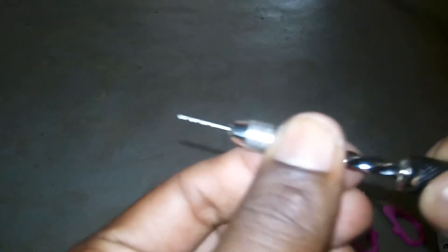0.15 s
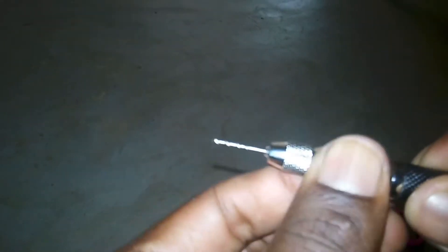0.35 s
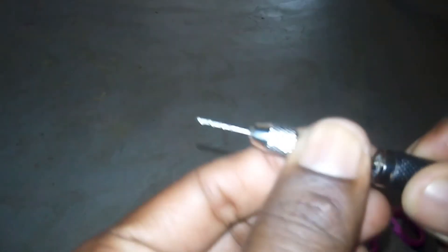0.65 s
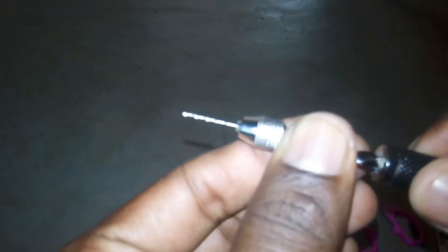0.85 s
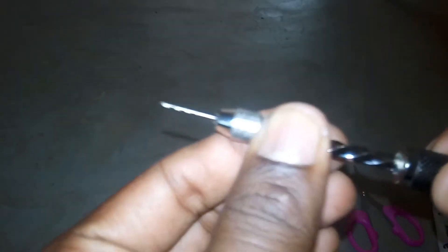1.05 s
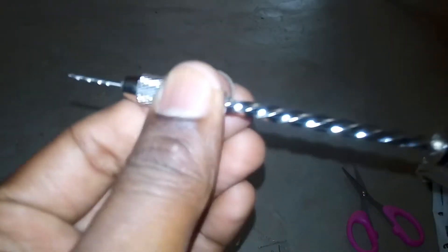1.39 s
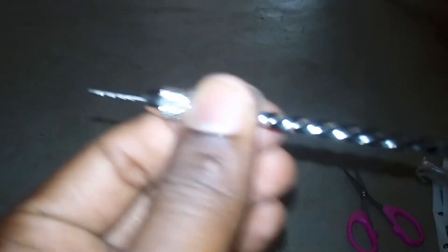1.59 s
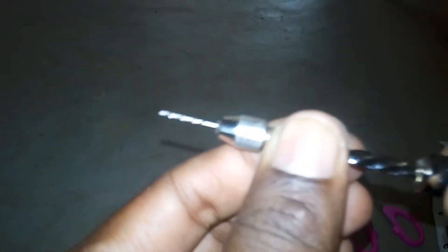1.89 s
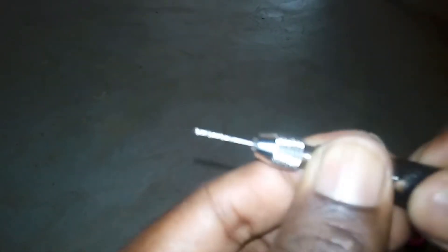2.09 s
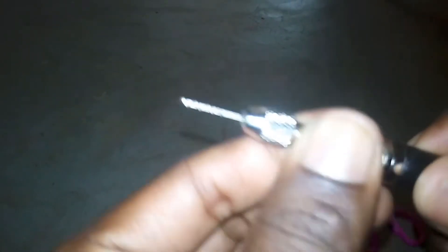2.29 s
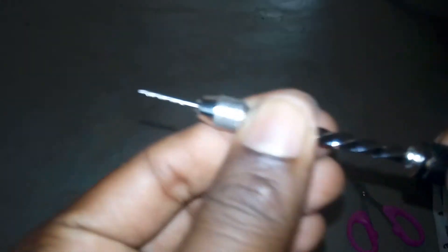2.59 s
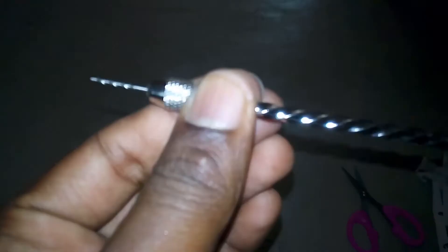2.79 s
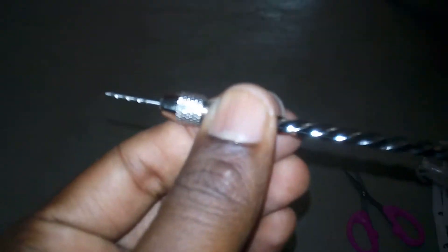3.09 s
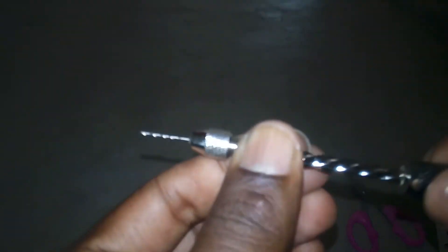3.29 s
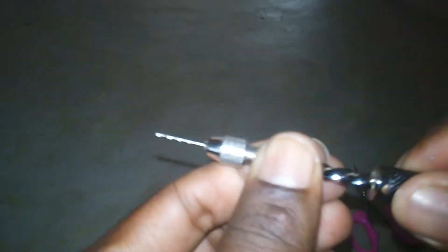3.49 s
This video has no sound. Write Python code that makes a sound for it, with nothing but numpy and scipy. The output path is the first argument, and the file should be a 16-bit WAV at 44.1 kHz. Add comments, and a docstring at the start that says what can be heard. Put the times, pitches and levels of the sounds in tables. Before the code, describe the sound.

A small spiral push drill, close and dry in a quiet room. Scratchy, chattering metal rubbing runs from 0 to 0.5 s, with clicks, then nearly stops. A faint stroke at 0.7-1.0 leads to a brighter, squealing one at 1.1-1.5. After a gap, rasp and squeaks run 1.7-2.2, ending in a hard clack and dull finger bump. Bright scraping at 2.4-2.9; a pause, then clicks and squeals from 3.1 to the end.

```python
"""Spiral push drill

A small spiral push drill is worked by hand, close by, in a quiet room. Its grip slides down and back
along the twisted steel shaft. Stick-slip friction at the threads excites the tool's resonances, the shaft
squeals thinly as gliding friction tones, loose parts click by impact, and fingers bump the tool dully.
Near reflections, ringing steel, a short room tail, faint low air noise and hiss complete the scene."""
import sys
import numpy as np
from scipy import signal
from scipy.io import wavfile
from scipy.ndimage import uniform_filter1d

SR = 44100
rng = np.random.default_rng(int(sys.argv[2]) if len(sys.argv) > 2 else 0)


def digitize_waveform(pressure):
    """Quantize a signal to 16-bit integers and store it at the path in sys.argv[1].

    Rows of a 2-D input are taken as channels; values are limited to [-1, 1].
    """
    field = np.atleast_2d(pressure).T
    bounded = np.clip(field, -1, 1)
    quanta = np.round(bounded * 32767).astype(np.int16)
    wavfile.write(sys.argv[1], SR, quanta)


N = 160965


def from_db(db):
    """Logarithmic level: decibels to amplitude gain."""
    return 10 ** (np.asarray(db) / 20)


def rms_one(x):
    """Normalisation: scale to unit rms."""
    return x / np.sqrt(np.mean(x ** 2) + 1e-20)


def in_time(rows):
    """Linear interpolation: each column of a curve at every sample."""
    s, *columns = np.transpose(rows)
    t = np.arange(N) / SR
    return [np.interp(t, s, column) for column in columns]


def band(x, low_hz, high_hz, order=2):
    """Band limitation: Butterworth band-pass."""
    edges_hz = [low_hz, min(high_hz, SR / 2 - 100)]
    return signal.sosfilt(signal.butter(order, edges_hz, "band", fs=SR, output="sos"), x + 1e-18)


def low_pass(x, hz):
    """High-frequency loss: second-order Butterworth low-pass."""
    return signal.sosfilt(signal.butter(2, hz, fs=SR, output="sos"), x)


def drift(hz):
    """Random fluctuation: low-passed noise of unit rms, wandering up to the given rate."""
    return rms_one(low_pass(rng.standard_normal(N), hz))


def scatter(width_hz):
    """Narrow-band noise: a complex envelope of unit power."""
    return (drift(width_hz / 2) + 1j * drift(width_hz / 2)) / np.sqrt(2)


def resonate(x, hz, width_hz):
    """Damped resonance: a two-pole filter with gain near 1 on top."""
    r = np.exp(-np.pi * width_hz / SR)
    zeros = np.array([1, 0, -1]) * (1 - r * r) / 2
    poles = [1, -2 * r * np.cos(2 * np.pi * hz / SR), r * r]
    return signal.lfilter(zeros, poles, x + 1e-18)


def glide(force, hz, width_hz):
    """Heterodyning: a steep-sided resonance at zero frequency is shifted to a moving centre."""
    turn = np.exp(2j * np.pi * np.cumsum(hz) / SR)
    r = np.exp(-np.pi * width_hz / SR)
    envelope = signal.lfilter([(1 - r) ** 2], [1, -2 * r, r * r], force * turn.conj() + 1e-18)
    return 2 * np.real(turn * envelope)


# spectrum of the room air, before scaling: f/Hz, relative density level/dB per Hz
AIR_SPECTRUM = [(25, -23.5), (55, -4.5), (140, 0.5), (220, -6), (450, -8.5), (700, -11), (1800, -17)]
AIR_DB, AIR_SWELL_DB, AIR_SWELL_HZ = -68.5, 1.6, 4.4   # overall rms; rms and top rate of each band's wander


def room_air():
    """Coloured noise: a faint low rumble summed from bands whose levels fluctuate independently."""
    hz, db = np.transpose(AIR_SPECTRUM)
    edges = np.geomspace(25, 2400, 14)   # Hz
    rumble = 0
    for low, high in zip(edges, edges[1:]):
        density_db = np.interp(np.log(low * high) / 2, np.log(hz), db)
        swell_db = AIR_SWELL_DB * drift(AIR_SWELL_HZ)
        rumble = rumble + from_db(density_db + swell_db) * band(rng.standard_normal(N), low, high)
    return from_db(AIR_DB) * rms_one(rumble)


ROOM_T60_S, ROOM_DB, ROOM_TOP_HZ = 0.28, -11, 5870


def room(x):
    """Reverberation: convolution with exponentially decaying noise, duller than the tool."""
    t = np.arange(SR // 2) / SR
    tail = rng.standard_normal(len(t)) * from_db(-60 * t / ROOM_T60_S) * (t > .004)
    tail = tail / np.linalg.norm(tail)
    return from_db(ROOM_DB) * signal.fftconvolve(low_pass(x, ROOM_TOP_HZ), tail)[:N]


# reflections off the hand and the table: delay t/s, level/dB
REFLECTIONS = [(.0022, -25.5), (.0047, -16.5)]


def echoes(x):
    """Discrete reflection: delayed, weaker copies colour the tool by interference."""
    return sum(from_db(db) * np.pad(x, (int(s * SR), 0))[:N] for s, db in REFLECTIONS)


# modes of the steel: f/Hz, level/dB (before RING_DB), decay time t60/s
STEEL_MODES = [(3580, -8.5, 0.17), (3680, -16, 0.23), (4040, -31, 0.35), (5900, -4, 0.23),
               (5840, -10, 0.166), (6570, -3.5, 0.26), (11100, -7, .18)]
RING_DB = 1


def ringing(x):
    """Modal decay: narrow, lightly damped modes of the steel outlast their excitation."""
    rung = 0
    for hz, db, t60 in STEEL_MODES:
        width_hz = np.log(1000) / np.pi / t60
        rung = rung + from_db(db) * resonate(x, hz, width_hz)
    return from_db(RING_DB) * rung


# the fingers bump and shift on the tool: t/s, level/dB at onset, centre f/Hz, decay t/s
FINGER_BUMPS = [(2.175, -47, 1060, 0.0027), (2.21, -57, 190, 0.031), (2.242, -51, 174, 0.015),
                (2.22, -62.5, 109, 0.12), (2.361, -66, 170, 0.081), (3.154, -42, 1170, 0.0021),
                (3.17, -49.5, 1330, 0.0099), (3.165, -64, 170, 0.071)]


def bumps():
    """Damped soft contact: band-limited noise with an exponential decay for each dull touch."""
    out, t = 0, np.arange(N) / SR
    for s, db, hz, decay_s in FINGER_BUMPS:
        thud = rms_one(band(rng.standard_normal(N), hz / 2, hz * 2))
        decay = (t >= s) * np.exp(-np.abs(t - s) / decay_s)
        out = out + from_db(db) * thud * decay
    return out


# resonances of the tool in three groups (low rasp, middle, treble): f/Hz, width f/Hz, level/dB
TOOL_MODES = [
    [(2301, 550, 2.5), (3400, 587, 10), (4143, 740, 0.5)],
    [(4840, 1050, 3), (5500, 980, 7.5), (6372, 540, 12), (7200, 1820, -1)],
    [(9310, 2370, -4.5), (10280, 840, 1.5), (11240, 720, 3.5), (12660, 2350, -3), (14600, 1300, -8)],
]
# pass band of each group: lower f/Hz, upper f/Hz
GROUP_BANDS = [(1700, 8500), (4200, 21500), (7700, 20500)]


def body(force, group):
    """Modal superposition: a force sounds one group of resonances, with alternating signs."""
    rung = 0
    for k, (hz, width, db) in enumerate(TOOL_MODES[group]):
        rung = rung + (-1) ** k * from_db(db) * resonate(force, hz, width)
    return band(rung, *GROUP_BANDS[group], order=4)


# the loose parts knock: t/s, then peak level/dB (before KNOCK_DB) of low rasp, middle, treble
PART_KNOCKS = [(0.0402, -29, -33, -35), (0.1537, -25, -32, -29), (0.3865, -19, -24.5, -40),
               (0.453, -34.5, -35, -37), (0.474, -35, -36, -40), (.502, -32, -31.5, -42.5),
               (0.785, -52, -55, -43), (0.8978, -52, -42.5, -38), (0.9287, -52, -47, -40.5),
               (1.052, -33, -31, -29.5), (1.121, -27, -35, -27), (1.2326, -52, -18, -18.5),
               (1.3317, -25, -19, -24), (1.6535, -38.5, -33, -33.5), (1.676, -39, -36, -36),
               (1.6879, -25, -33, -40), (1.7042, -22, -24.5, -28), (1.8, -52, -28, -22.5),
               (1.877, -49, -25, -22.5), (1.89, -35, -28, -23), (1.945, -51, -33.5, -35.5),
               (2.1759, -21, -14.5, -20), (2.238, -36, -30.5, -35), (2.369, -33, -40, -58),
               (2.386, -30, -29.5, -35.5), (2.6315, -32, -33, -25), (2.648, -34, -35, -25),
               (2.7161, -30, -21, -20), (2.747, -29, -43, -21), (2.913, -34, -36, -39),
               (3.0781, -40, -33.5, -31.5), (3.1325, -22.5, -25.5, -25.5), (3.153, -42, -27, -40),
               (3.178, -52, -33, -28), (3.315, -42, -32, -32), (3.376, -37, -24.5, -27),
               (3.438, -27, -34.5, -38), (3.483, -38, -32.5, -41)]
KNOCK_DB, SKID_S, SKID_DB = -3.5, 0.00075, 5


def knocks():
    """Impact excitation: an impulse and a brief noisy skid strike the tool's resonances."""
    out, t = np.zeros(N + SR), np.arange(SR // 20) / SR
    skid = from_db(SKID_DB) * t / SKID_S * np.exp(-t / SKID_S)
    for s, *peaks_db in PART_KNOCKS:
        start = int(s * SR)
        for group, db in enumerate(peaks_db):
            force = (t == 0) + skid * rng.standard_normal(len(t))
            hit = body(force, group)
            out[start:start + len(t)] += from_db(db + KNOCK_DB) * hit / np.abs(hit).max()
    return out[:N]


# the threads catch and slip: t/s, catch rate f/Hz (before jitter), depth level/dB (before spread and shares)
THREAD_CATCHES = [(0, 56.3, 19.5), (.33, 111, 12), (.46, 85, 17), (.92, 60.7, 13), (1.2, 70, 14.5),
                  (1.35, 76, 15.5), (1.47, 72, 12), (1.75, 83, 12), (2.1, 80, 10), (2.65, 72, 18.5),
                  (2.77, 90, 19), (2.83, 83.4, 8.5), (3.25, 66, 17.5), (3.65, 55, 15)]
CATCH_JITTER, CATCH_JITTER_HZ = .16, 46.1   # rms of the log rate; top rate of its wander
CATCH_SPREAD, CATCH_RISE_SHARE = .2, .36   # rms spread of strength; share of each catch spent rising


def chatter():
    """Stick-slip: friction swells in dB once for each catch of the threads, unevenly."""
    rate, depth_db = in_time(THREAD_CATCHES)
    catches = np.cumsum(rate * np.exp(CATCH_JITTER * drift(CATCH_JITTER_HZ))) / SR
    swell = np.interp(catches % 1, [0, CATCH_RISE_SHARE, 1], [0, 1, 0])
    strength = 1 + CATCH_SPREAD * rng.standard_normal(size=1000)[catches.astype(int)]
    return swell * depth_db * strength


def throb(db):
    """Amplitude modulation: a gain that swings by db while its local mean power stays put."""
    gain = from_db(db)
    return gain / np.sqrt(uniform_filter1d(gain ** 2, size=1800))


# travel of the grip: t/s, position (0 at the chuck to 1 at the far end)
GRIP_TRAVEL = [(0, 0.48), (.85, 0), (1.15, 0.26), (1.48, 0.65), (1.7, 0.57), (2.2, 0.2), (2.45, 0.146),
               (2.95, 0.95), (3.15, 0.59), (3.6, 0.072)]


def grip_travel():
    """Kinematics: position of the grip along the shaft at every sample."""
    return in_time(GRIP_TRAVEL)[0]


# gliding tones of the shaft, one list each: t/s, pitch f/Hz (before waver), level/dB (before chopping)
SHAFT_SQUEALS = [
    [(.67, 5550, -56), (.7, 5350, -55.5)],
    [(1.11, 5500, -54), (1.145, 5546, -41.5), (1.232, 5930, -37.5), (1.29, 5900, -38), (1.35, 6200, -46.5),
     (1.38, 6320, -37), (1.44, 6700, -47), (1.49, 6700, -47)],
    [(1.37, 6800, -49), (1.425, 7250, -53), (1.445, 7250, -60)],
    [(1.72, 6570, -60), (1.76, 6680, -42), (1.79, 6640, -52), (1.81, 6590, -37), (1.845, 6480, -41),
     (1.868, 7130, -40), (1.885, 7200, -52)],
    [(1.715, 2170, -54), (1.745, 2132, -49.5), (1.775, 2087, -58)],
    [(2.07, 3220, -55), (2.09, 3197, -35.5), (2.11, 3000, -52)],
    [(2.64, 5660, -47.5), (2.75, 5750, -46.5), (2.795, 6200, -41), (2.845, 6520, -43), (2.91, 6480, -53)],
    [(3.17, 6520, -67), (3.208, 6490, -44), (3.222, 6570, -50), (3.25, 6580, -43), (3.315, 6620, -37.5),
     (3.345, 6520, -40), (3.376, 6400, -34.5), (3.41, 6800, -53)],
]
# pairs are (push, draw): share of noise power, rms pitch waver, share of the chatter
SQUEAL_ROUGH, SQUEAL_WAVER, SQUEAL_CHATTER_SHARE = (.3, .45), (.006, .011), (.75, 1)
SQUEAL_WAVER_HZ, SQUEAL_WIDTH_HZ = 114.8, 620
# hiss around twice the pitch, at its full share once the squeal reaches OCTAVE_FULL_DB
OCTAVE_DB, OCTAVE_WIDTH_HZ, OCTAVE_FULL_DB = -8, 1800, -41


def squeals(chatter_db):
    """Friction-driven oscillation: tones with a hissy octave, rougher and more chopped on the draw."""
    out, t = 0, np.arange(N) / SR
    drawn = np.gradient(grip_travel()) > 0

    def by_stroke(pair):
        """Piecewise motion: the push or the draw setting at each sample."""
        push, draw = pair
        return np.where(drawn, draw, push)

    rough = by_stroke(SQUEAL_ROUGH)
    waver = 1 + by_stroke(SQUEAL_WAVER) * drift(SQUEAL_WAVER_HZ)
    chop = throb(by_stroke(SQUEAL_CHATTER_SHARE) * chatter_db)
    for rows in SHAFT_SQUEALS:
        hz, db = in_time(rows)
        grain = np.sqrt(1 - rough) + np.sqrt(rough) * scatter(SQUEAL_WIDTH_HZ)
        octave_db = OCTAVE_DB + np.minimum(db - OCTAVE_FULL_DB, 0)
        octave = from_db(octave_db) * scatter(OCTAVE_WIDTH_HZ)
        turn = np.exp(2j * np.pi * np.cumsum(hz * waver) / SR)
        active = 1. * ((t > rows[0][0]) & (t < rows[-1][0]))
        sounding = uniform_filter1d(active, size=300)   # softened ends
        out = out + sounding * from_db(db) * np.real(grain * turn + octave * turn ** 2)
    return np.sqrt(2) * out * chop


# rubbing of grip on shaft: t/s, then level/dB (before RUB_TRIM_DB) of low rasp, middle, treble
GRIP_RUB = [(0, -42.5, -47.5, -46), (0.02, -54, -54.5, -48.5), (0.085, -50.5, -63.5, -61.5),
            (0.14, -51, -53.5, -55.5), (0.22, -45, -55, -51), (0.29, -39.5, -40.5, -44.5),
            (0.42, -45, -45, -45), (0.46, -45.5, -49, -50.5), (0.5, -75, -79, -66), (0.53, -103, -104, -83),
            (0.655, -78, -78, -112), (0.69, -48, -57.5, -75), (0.735, -58.5, -60, -67),
            (0.87, -57, -66.5, -65.5), (1.1, -49, -51, -46), (1.15, -45.5, -55, -41.5),
            (1.29, -41, -41, -31), (1.36, -43, -55, -41.5), (1.475, -50, -44.5, -42.5),
            (1.505, -62, -70, -62.5), (1.66, -82.5, -81, -102), (1.71, -41.5, -64.5, -43.5),
            (1.75, -43.5, -43.5, -43), (1.88, -44.5, -52, -49), (1.93, -48.5, -54.5, -54.5),
            (2.04, -50, -52, -50), (2.125, -38.5, -38.5, -43), (2.19, -39, -46.5, -40.5),
            (2.23, -62, -52, -52), (2.27, -91, -84, -69), (2.345, -69.5, -70, -104),
            (2.37, -55.5, -59.5, -60), (2.47, -55.5, -62, -57), (2.585, -44, -53.5, -50),
            (2.61, -45.5, -42, -35.5), (2.77, -42.5, -40.5, -32.5), (2.86, -47, -51, -43.5),
            (2.905, -51.5, -60, -47), (2.935, -96, -62, -85), (3.13, -63, -90, -75),
            (3.165, -49, -46, -40.5), (3.21, -52.5, -74, -56), (3.26, -46.5, -52, -52),
            (3.33, -51.5, -51, -46.5), (3.39, -49.5, -56, -48.5), (3.47, -52, -55, -58),
            (3.57, -49.5, -54.5, -50), (3.65, -48.5, -44.5, -55)]
# for low rasp, middle, treble: level trim; share of the chatter; relative pitch rise over the travel
RUB_TRIM_DB, CHATTER_SHARE, TRAVEL_RISE = (-2.5, -3, -4), (0.31, 0.49, .85), (0.14, 0.042, 0.007)
# tiny slips of the rubbing steel, and scratchy ticks that ring more narrowly
SLIPS_PER_S, TICKS_PER_S, TICK_DB, TICK_WIDTH_SHARE, TICK_DETUNE = 9000, 480, -2, .35, .022
# the contact shifts: each resonance wanders in pitch (rms share) and strength
WANDER, WANDER_HZ, COLOUR_DB, COLOUR_HZ = 0.02, 5.5, 3, 11.5
DULL_RUB_DB, DULL_RUB_HZ = -21.5, (1135, 2680)   # relative to the untrimmed low rasp


def rubbing(chatter_db):
    """Random impulsive excitation: dense slips and sparser detuned ticks drive shifting resonances."""
    out, levels_db, travel = 0, in_time(GRIP_RUB), grip_travel()
    tick_starts = rng.random(N) < TICKS_PER_S / SR
    for k, level_db in enumerate(levels_db):
        pressure = from_db(level_db + RUB_TRIM_DB[k]) * throb(CHATTER_SHARE[k] * chatter_db)
        # expected noise power through the group's resonances
        power = sum(from_db(2 * db) * width for _, width, db in TOOL_MODES[k]) * np.pi / 2 / SR
        rung = 0
        for hz, width, db in TOOL_MODES[k]:
            slip_starts = rng.random(N) < SLIPS_PER_S / SR
            slips = rms_one(rng.standard_normal(N) * slip_starts)
            ticks = from_db(TICK_DB) * rms_one(rng.standard_normal(N) * tick_starts)
            ticks = ticks / np.sqrt(TICK_WIDTH_SHARE)   # makes up for the narrower resonance
            centre = hz * (1 + TRAVEL_RISE[k] * (travel - .5) + WANDER * drift(WANDER_HZ))
            # each tick holds a pitch of its own until the next
            detune = 1 + TICK_DETUNE * rng.standard_normal(N)[np.cumsum(tick_starts)]
            colour = rms_one(from_db(COLOUR_DB * drift(COLOUR_HZ)))
            force = from_db(db) * pressure * colour
            rung = rung + glide(slips * force, centre, width)
            rung = rung + glide(ticks * force, centre * detune, width * TICK_WIDTH_SHARE)
        out = out + band(rung, *GROUP_BANDS[k]) / np.sqrt(power)
    dull = rms_one(band(rng.standard_normal(N), *DULL_RUB_HZ, order=3))
    return out + dull * from_db(levels_db[0] + DULL_RUB_DB)


HISS_DB, AIR_SIDE_DB = -85.5, -6
AIR_SIDE_TOP_HZ = 1610   # the air differs between left and right mainly below this


def scene():
    """Superposition: the drill dead centre, room and hiss in the middle, low air noise also at the sides."""
    chatter_db = chatter()
    drill = rubbing(chatter_db) + squeals(chatter_db) + knocks() + bumps()
    near = drill + echoes(drill) + ringing(drill)
    hiss = from_db(HISS_DB) * rng.standard_normal(N)
    mid = near + room(near) + room_air() + hiss
    side = from_db(AIR_SIDE_DB) * low_pass(room_air(), AIR_SIDE_TOP_HZ)
    return np.array([mid + side, mid - side])


def record(dry):
    """Band limitation: a steep elliptic low-pass cuts the top above 15.6 kHz."""
    return signal.sosfilt(signal.ellip(10, .3, 70, 15600, fs=SR, output="sos"), dry)


dry = scene()
out = record(dry)
digitize_waveform(out)
```